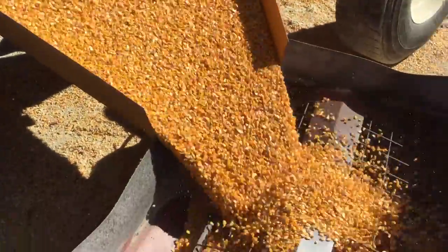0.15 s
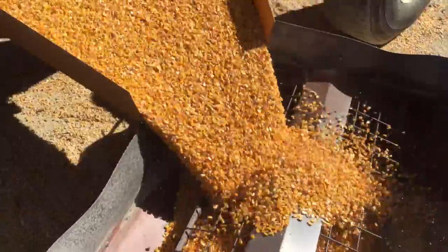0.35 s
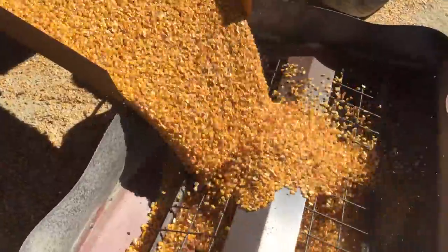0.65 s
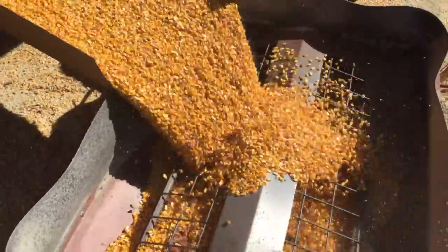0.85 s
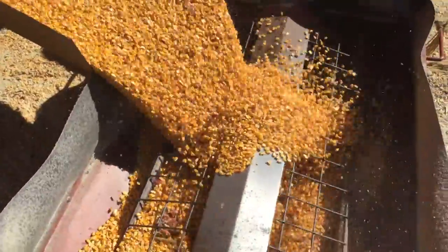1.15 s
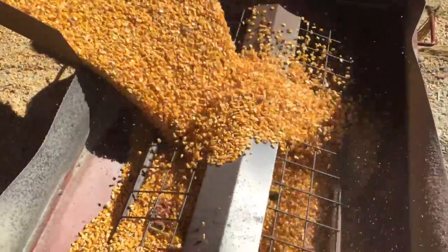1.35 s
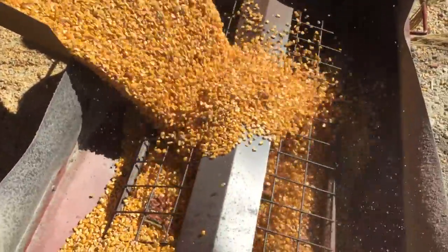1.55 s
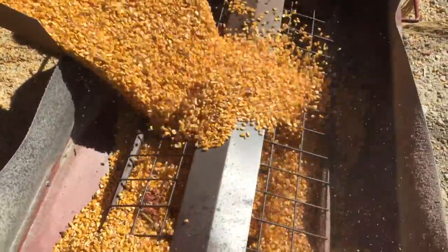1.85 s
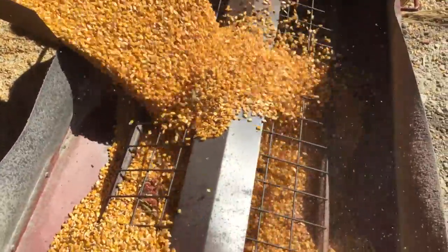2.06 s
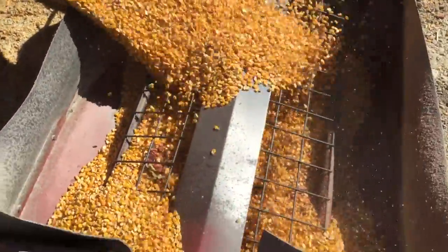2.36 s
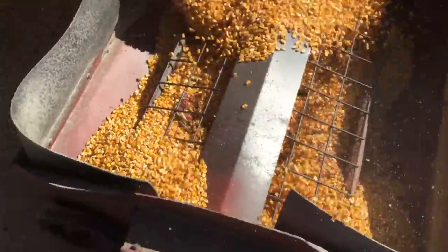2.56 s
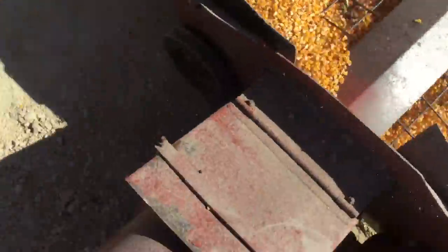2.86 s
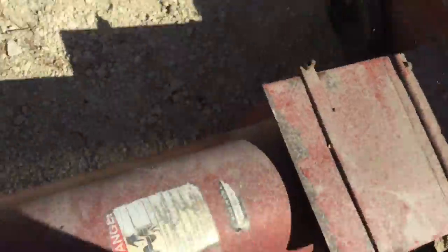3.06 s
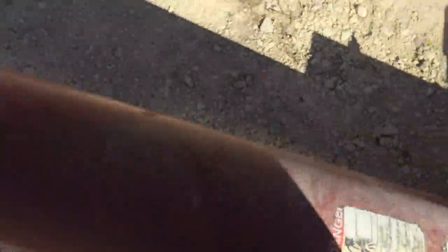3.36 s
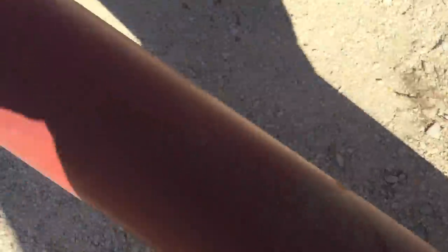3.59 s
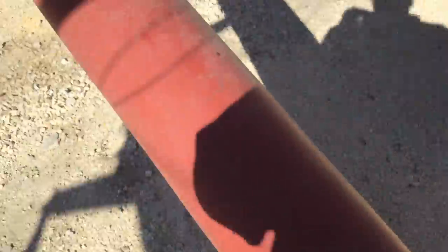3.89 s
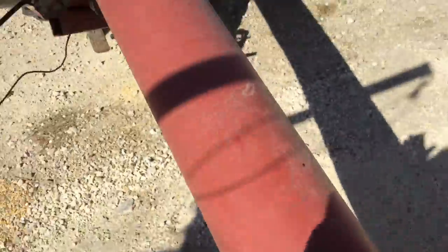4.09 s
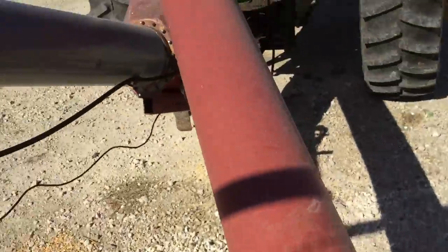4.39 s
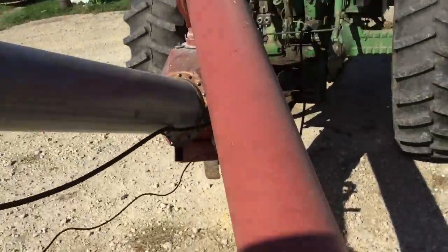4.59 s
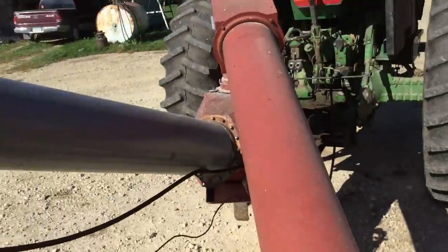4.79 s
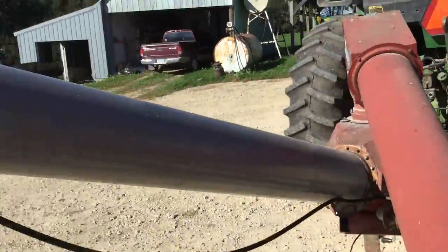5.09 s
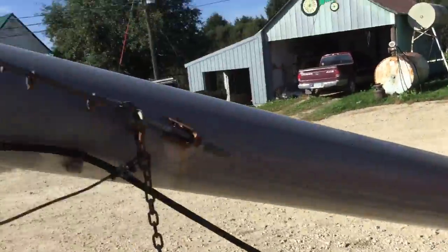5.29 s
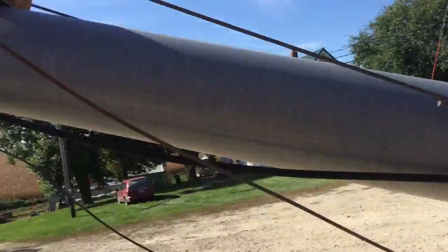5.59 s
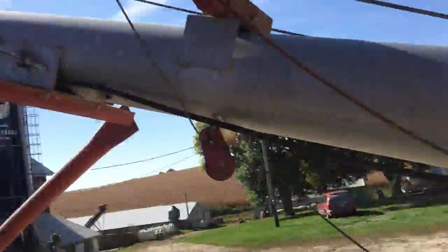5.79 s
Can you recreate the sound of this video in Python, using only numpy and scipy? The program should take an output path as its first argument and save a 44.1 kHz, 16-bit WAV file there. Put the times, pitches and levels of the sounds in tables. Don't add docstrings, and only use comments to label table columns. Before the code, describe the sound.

From 0 s a loud, dense, bright hiss fills everything: countless dry corn kernels hitting steel grate, hopper walls and each other, too thick to separate, slightly rough and overloaded. Under it run low sheet-metal rumble, two whining low gear tones pulsing about ten times a second, fuzzy chain hum and a steady diesel drone; faint low wind adds lumpiness. The first gear tone beats gently until about 2.9 s. Around 2.8-3.5 s the handheld microphone passes close over a metal cover: the hiss turns hollow, then whistly and briefly shaded on top, while the rumble swells. By 3.8 s it faces the tractor; the hiss eases slightly and, until about 5 s, a rapid metallic engine knock is more exposed, strongest near 4 s. At about 5.4 s it tips upward along the tube; the lower gear whine falls sharply, while hiss and diesel continue, cutting off without fading near 5.9 s.

```python
import sys
import numpy as np
from scipy import signal
from scipy.fft import rfft, irfft
from scipy.io import wavfile
from scipy.ndimage import uniform_filter1d

SR = 44100
rng = np.random.default_rng(int(sys.argv[2]) if len(sys.argv) > 2 else 0)


def wrap_up_sound(samples):
    columns = np.atleast_2d(samples).T
    tamed = np.clip(columns, -1, 1)
    steps = np.round(tamed * 32767).astype(np.int16)
    wavfile.write(sys.argv[1], SR, steps)


def voltage_ratio(level):
    return 10 ** (np.asarray(level, float) / 20)


N = 261954

PASS_S, PASS_LENGTH_S = 3.11, 0.38
CLEAR_S, CLEAR_LENGTH_S = 3.82, 0.19
AWAY_S, AWAY_LENGTH_S = 5.44, 0.066


def evened(x):
    return x / np.sqrt(np.mean(x ** 2) + 1e-20)


def read(points, hz):
    f, value = np.transpose(points)
    return np.interp(np.log(hz + 1), np.log(f + 1), value)


def follow(rows, t):
    s, *columns = np.transpose(rows)
    return [np.interp(t, s, c) for c in columns]


def bump(t, s, length_s):
    return np.exp(-((t - s) / length_s) ** 2)


def after(t, s, length_s):
    return .5 + .5 * np.tanh((t - s) / length_s)


def drift(rate_hz, t):
    steps = np.arange(0, N / SR, 1 / 200)
    rates_hz = np.geomspace(.15, 1, 24) * rate_hz
    slow = sum(np.sin(2 * np.pi * (f * steps + rng.random())) for f in rates_hz)
    return np.interp(t, steps, evened(slow))


def resonate(x, hz, width_hz):
    r = np.exp(-np.pi * width_hz / SR)
    pole = [1, -r * np.exp(2j * np.pi * hz / SR)]
    once = signal.lfilter([1 - r], pole, x)
    return 2 * signal.lfilter([1 - r], pole, once).real


def breeze(t):
    sos = signal.butter(2, [22, 85], "bandpass", fs=SR, output="sos")
    puffs = signal.sosfilt(sos, rng.standard_normal(N))
    level_db = -44.5 - 8 * after(t, CLEAR_S, CLEAR_LENGTH_S) - 8 * after(t, AWAY_S, AWAY_LENGTH_S)
    return voltage_ratio(level_db + 3.2 * drift(5.7, t)) * evened(puffs)


def rumble(t):
    # (frequency [Hz], level [dB per Hz])
    wall_spectrum = [(60, -44), (100, -16), (140, -12), (180, 0), (230, -3.5), (300, -1), (370, -5),
                     (450, -16), (650, -31)]
    # (frequency [Hz], width [Hz], level [dB])
    chain_hums = [(235.3, 2.8, -35), (256.3, 5.5, -41), (355.3, 14, -45)]
    hz = np.fft.rfftfreq(N, 1 / SR)
    spectrum = rfft(rng.standard_normal(N)) * voltage_ratio(read(wall_spectrum, hz)) * (hz < 900)
    walls = evened(irfft(spectrum, N))
    hums = sum(voltage_ratio(db) * evened(resonate(rng.standard_normal(N), f, w)) for f, w, db in chain_hums)
    walls_db = -23.5 + 3 * bump(t, PASS_S + 0.32, .6) - 1.5 * after(t, CLEAR_S, CLEAR_LENGTH_S)
    return voltage_ratio(walls_db) * walls + hums


def exhaust(t, cycles):
    # (order [per cycle], level [dB])
    orders = [(6, -56), (10, -48), (11, -51), (12, -39), (13, -46), (18, -32), (20, -43), (21, -43),
              (22, -46), (23, -45), (24, -34), (26, -43), (28, -41), (30, -37), (32, -48), (36, -48),
              (48, -44), (50, -46)]
    tones = np.zeros(N)
    for order, db in orders:
        phase = 2 * np.pi * (round(order) * cycles + rng.random())
        tones += np.sqrt(2) * voltage_ratio(db + 1.75 * drift(1.836, t)) * np.sin(phase)
    level_db = -3.5 + 4.5 * after(t, CLEAR_S - .1, CLEAR_LENGTH_S)
    level_db += 1.5 * after(t, AWAY_S - .2, AWAY_LENGTH_S)
    return voltage_ratio(level_db) * tones


def engine_knock(t, cycles):
    firing_db = [-9, -10, 0, -3, -7, -9]
    # (frequency [Hz], width [Hz], level [dB])
    block_modes = [(633, 340, -11.5), (1163, 60, -17), (1458, 410, -11)]
    # (frequency [Hz], width [Hz])
    cover_mode = (1227, 28)
    nearest_cylinder = 2
    firing = (cycles * len(firing_db)).astype(int)
    cylinder = firing % len(firing_db)
    blows = np.diff(firing, prepend=0) * voltage_ratio(np.array(firing_db)[cylinder])
    block = sum(voltage_ratio(db) * evened(resonate(blows, f, w)) for f, w, db in block_modes)
    block_db = -37 + 9 * bump(t, 4, 0.2)
    cover = evened(resonate(blows * (cylinder == nearest_cylinder), *cover_mode))
    cover_in_view = after(t, 3.8, 0.14) - after(t, 4.96, 0.14)
    cover_db = -29 - 11.5 * (1 - cover_in_view)
    return voltage_ratio(block_db) * evened(block) + voltage_ratio(cover_db) * cover


def diesel(t):
    cycles_per_s = 11.725
    cycles = cycles_per_s * t
    return exhaust(t, cycles) + engine_knock(t, cycles)


def gears(t):
    # (rate [Hz], depth [0-1])
    turn_swells = [(9.9, .3), (11.4, .55)]
    mesh_hz = (185.9, 218.55)
    mesh_db, clear_db, away_db = (-23, -27), (0, 2.5), (-10.5, -2.5)
    beat_s, beat_dip_s, beat_depth, beat_end_s = 0.58, 0.41, .6, 2.87
    beat = beat_depth * (1 - after(t, beat_end_s, .05))
    beat = beat * np.cos(np.pi * (t - beat_dip_s) / beat_s) ** 4
    firming_db = 1.26 * np.minimum(t, beat_end_s)
    sway = (np.clip(1 - beat, 0, 1) * voltage_ratio(firming_db), 1)
    out = np.zeros(N)
    for k, (turn_hz, depth) in enumerate(turn_swells):
        db = mesh_db[k] + clear_db[k] * after(t, beat_end_s, .06)
        db += away_db[k] * after(t, AWAY_S, AWAY_LENGTH_S)
        swell = 1 + depth * np.cos(2 * np.pi * turn_hz * t + .6 * drift(1.2, t))
        tone = np.sin(2 * np.pi * mesh_hz[k] * t + .3 * drift(.8, t))
        out += np.sqrt(2) * voltage_ratio(db) * sway[k] * swell * tone
    return out


def kernel_colour_db(t, f, facing):
    # (frequency [Hz], level [dB per Hz])
    pour_spectrum = [(250, -40), (420, -14), (460, -13.5), (770, -10.5), (951, -9.5), (1570, -4),
                     (2000, -4), (2290, -10), (3720, -1.5), (5680, -2.5), (6410, -2), (8290, -2.5),
                     (9650, -10), (11200, -4), (15700, -12.5)]
    # (frequency [Hz], level [dB per Hz])
    tube_spectrum = [(250, -25), (420, -7), (520, -8), (680, -6), (850, -12), (1200, -4), (1770, -11.5),
                     (2600, -5.5), (4810, -6.5), (6910, 0.5), (8000, -7), (9080, -8.5), (9800, -14),
                     (15700, -17)]
    grip_s, grip_length_s = 3.3, 0.23
    passing = bump(t, PASS_S, PASS_LENGTH_S)
    clear = after(t, CLEAR_S, CLEAR_LENGTH_S)
    settling = bump(t, 0, .5)

    colour_db = facing * read(pour_spectrum, f) + (1 - facing) * read(tube_spectrum, f)
    hollow_hz = 3740 - 1100 * bump(t + .07, PASS_S, PASS_LENGTH_S)
    hollow_db = 0.03 + 7 * bump(t - .03, PASS_S, PASS_LENGTH_S) + 2 * settling - 1.3 * clear
    colour_db += hollow_db * np.exp(-(np.log(f / hollow_hz + 1e-9) / 0.25) ** 2)
    tube_ring_db = 0.24 - 2 * passing - 2 * clear
    colour_db += tube_ring_db * np.exp(-(np.log(f / 1500 + 1e-9) / 1.9) ** 2)
    hand_shade_db = -3.1 - 1.5 * settling + 3.0 * passing + 1.3 * clear
    hand_shade_db -= 4 * bump(t, grip_s, grip_length_s)
    colour_db += hand_shade_db * np.clip((f - 9500) / 3000, 0, 1)
    port_whistle_db = .5 - 0.47 * t - 3 * passing + 6.5 * bump(t + .06, grip_s, grip_length_s)
    colour_db += port_whistle_db * np.exp(-((f - 6950) / 400) ** 2)
    rim_hz = 10700 + (8750 - 10700) * after(t, 3.1, 0.19)
    rim_db = 0 + 4 * passing ** 2
    colour_db += rim_db * np.exp(-((f - rim_hz) / 600) ** 2)

    main = (f[:, 0] > 5000) & (f[:, 0] < 9000)
    return colour_db - 10 * np.log10((voltage_ratio(colour_db[main]) ** 2).sum(0) / len(f))


def kernels():
    # (time [s], facing the hopper [0-1], hiss level [dB])
    phone_swing = [(0, 0.77, -12.5), (1.4, 0.74, -12), (2.5, 0.8, -12.4), (2.8, 0.5, -12.5),
                   (3., 0.44, -13), (3.25, 0.58, -12), (3.55, .27, -13), (3.85, 0.37, -14),
                   (4.2, 0.36, -13.5), (4.8, 0.1, -13.5), (5.3, 0.38, -14), (5.94, 0.16, -14)]
    clicks_per_s, spread_db = 36000, 1.5
    streak_db, patch_db, throb_db = 1.56, .3, 0.27
    click_amp = voltage_ratio(spread_db * rng.exponential(1, N))
    hail = rng.standard_normal(N) * click_amp * (rng.random(N) < clicks_per_s / SR)
    hz, t, z = signal.stft(evened(hail), SR, nperseg=1024, noverlap=768)
    f = hz[:, None]
    facing, level_db = follow(phone_swing, t)
    colour_db = kernel_colour_db(t, f, np.clip(facing, 0, 1))
    a, b = rng.standard_normal((len(t), len(hz), 2)).T
    streaks = evened(uniform_filter1d(uniform_filter1d(a, size=2, axis=0), 70, 1))
    patches = evened(uniform_filter1d(uniform_filter1d(b, 60, 0), 6, 1))
    throb = drift(14, t) * np.clip(f / 6000, 0, 1.5)
    texture_db = streak_db * streaks + patch_db * patches + throb_db * throb
    z = z * voltage_ratio(colour_db + level_db + texture_db)
    return signal.istft(z, SR, nperseg=1024, noverlap=768)[1][:N]


def scene():
    t = np.arange(N) / SR
    mono = breeze(t) + rumble(t) + diesel(t) + gears(t) + kernels()
    return np.tile(mono, (2, 1))


def swapped(x):
    # (time [s], lowest band edge [Hz], bands [count])
    swap_moments = [(0.108, 8220, 2), (0.317, 4590, 1), (0.55, 6900, 3), (0.573, 4220, 2), (0.643, 5400, 1),
                    (0.689, 12400, 1), (0.991, 5600, 2), (1.269, 4180, 3), (1.316, 10290, 2),
                    (1.386, 13090, 1), (1.595, 13030, 1), (1.85, 6900, 1), (2.082, 5190, 1),
                    (2.848, 10270, 1), (2.941, 10290, 1), (3.22, 11670, 1), (3.986, 8930, 1),
                    (4.033, 4160, 2), (4.126, 10290, 1), (4.172, 5080, 3), (4.358, 5620, 3),
                    (4.567, 14200, 1), (4.636, 5080, 2), (4.752, 10960, 1), (4.915, 10980, 1),
                    (5.031, 4160, 1), (5.147, 5660, 1), (5.17, 7490, 2), (5.217, 10940, 1), (5.89, 5620, 1)]
    step_hz, width_hz, widening = 3300, 1050, .07
    out, size = x.copy(), 2048
    hz = np.fft.rfftfreq(size, 1 / SR)
    fade = signal.windows.kaiser_bessel_derived(size, 4 * np.pi)
    for s, lowest_hz, count in swap_moments:
        part = out[:, round(s * SR):][:, :size]
        length = part.shape[1]
        for low_hz in lowest_hz + step_hz * np.arange(count):
            band = (hz > low_hz) & (hz < low_hz * (1 + widening) + width_hz)
            padded = np.pad(part, ((0, 0), (0, size - length)))
            own = irfft(rfft(padded) * band, size)
            noise = irfft(rfft(rng.standard_normal((2, size))) * band, size)
            noise = evened(noise) * own.std()
            change = (np.sqrt(1 - fade ** 2) - 1) * own + fade * noise
            part += irfft(rfft(change) * band, size)[:, :length]
    return out


def band_limit(x):
    return signal.sosfilt(signal.butter(12, 15810, fs=SR, output="sos"), x)


def record(dry):
    limited = dry / (1 + abs(dry / .96) ** 5) ** (1 / 5)
    mix = swapped(limited)
    return band_limit(mix)


dry = scene()
out = record(dry)
wrap_up_sound(out)
```